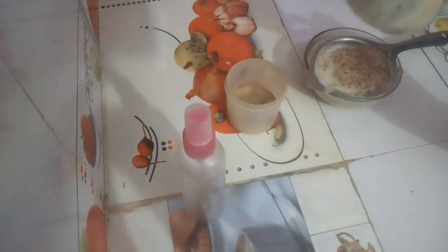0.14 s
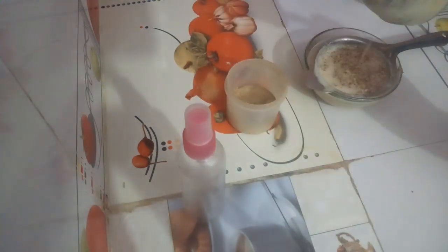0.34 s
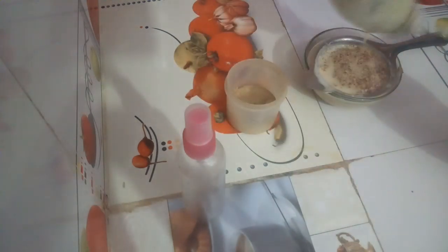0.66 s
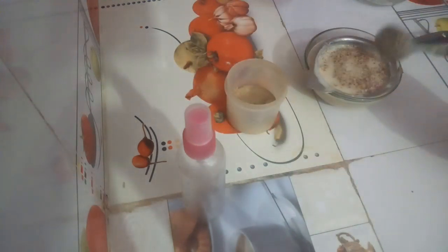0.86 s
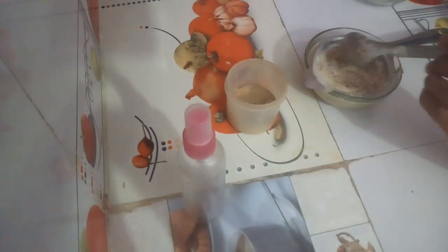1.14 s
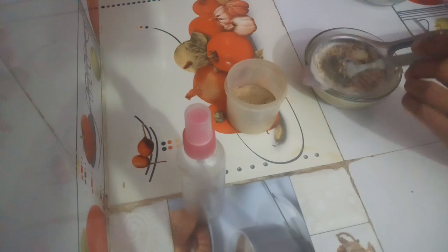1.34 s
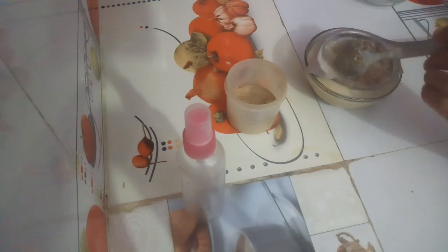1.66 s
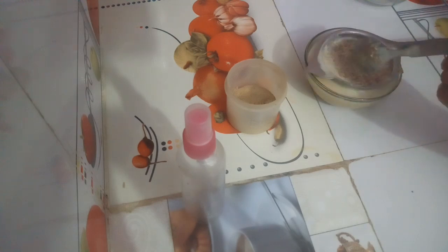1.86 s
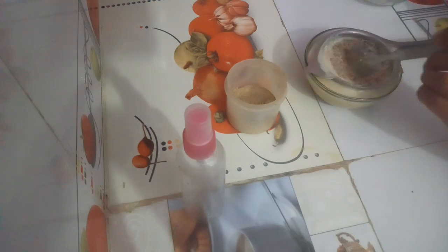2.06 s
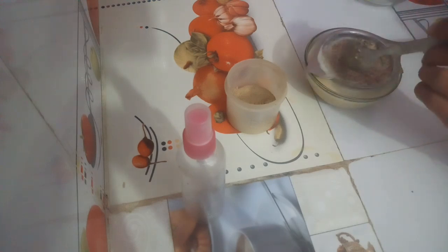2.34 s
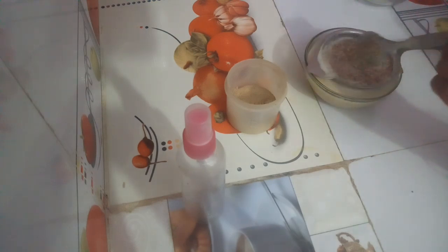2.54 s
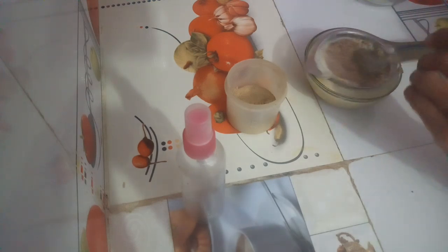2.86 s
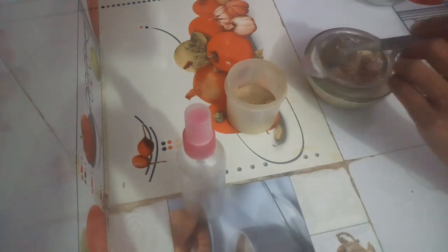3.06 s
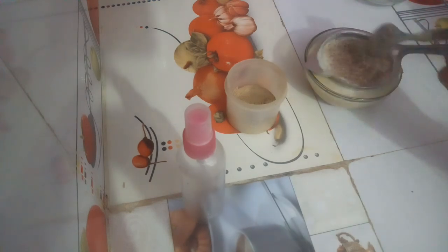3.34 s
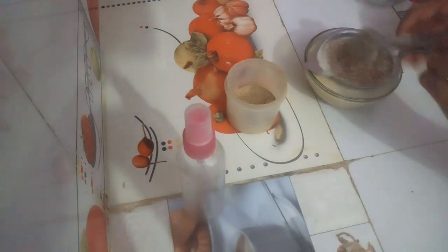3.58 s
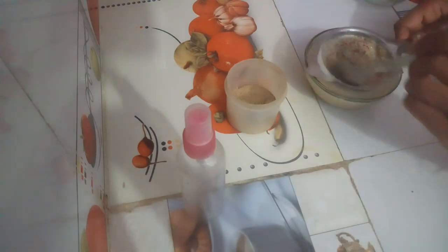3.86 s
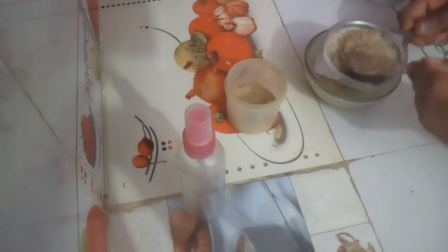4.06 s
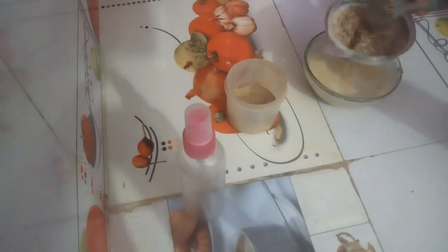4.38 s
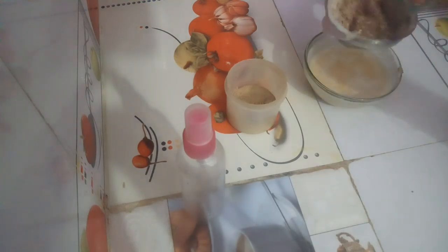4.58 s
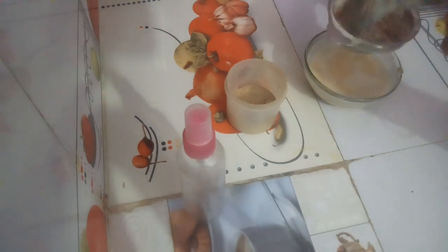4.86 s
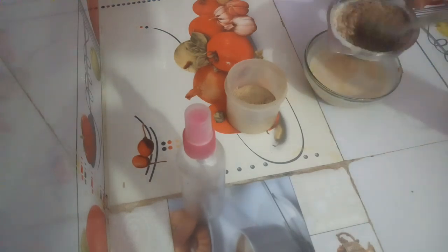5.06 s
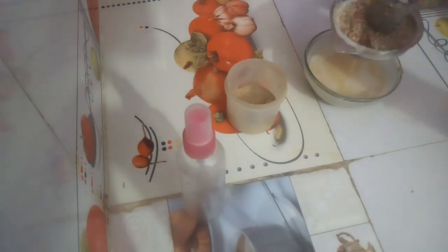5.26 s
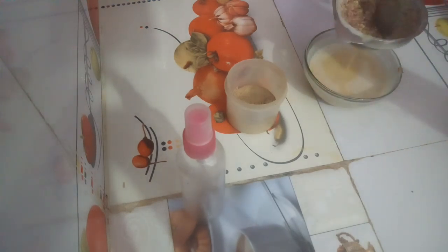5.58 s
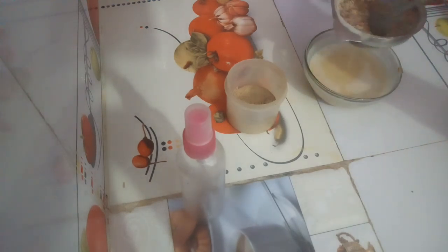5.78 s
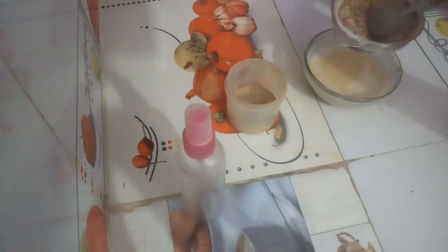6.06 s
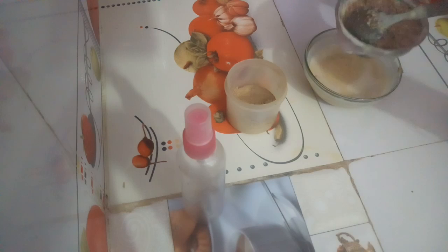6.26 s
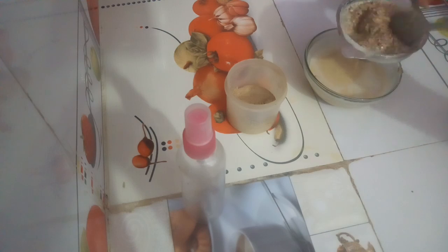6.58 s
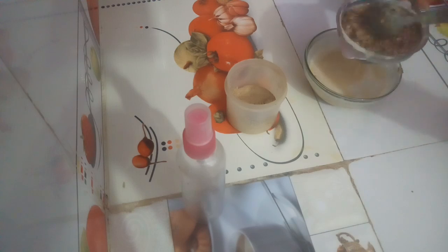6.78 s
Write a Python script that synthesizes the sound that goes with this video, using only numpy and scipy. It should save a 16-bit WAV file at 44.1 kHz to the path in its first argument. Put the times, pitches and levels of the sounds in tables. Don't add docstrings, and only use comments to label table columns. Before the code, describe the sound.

A metal spoon knocks, scrapes and taps a wire strainer over a ringing glass bowl in a small tiled kitchen, with wet paste squelching faintly.

```python
import sys
import numpy as np
from scipy import signal
from scipy.io import wavfile
from scipy.ndimage import uniform_filter1d

SR = 44100
rng = np.random.default_rng(int(sys.argv[2]) if len(sys.argv) > 2 else 0)


def to_linear_factor(level_db):
    exponent = np.asarray(level_db, float) / 20
    return 10 ** exponent


def generate_wav(signal):
    frames = np.transpose(np.atleast_2d(signal))
    scaled = np.clip(frames, -1, 1) * 32767
    pcm = np.round(scaled).astype(np.int16)
    wavfile.write(sys.argv[1], SR, pcm)


N = 305613


def evened(x):
    return x / np.sqrt(np.mean(x ** 2) + 1e-20)


def read(points, hz):
    f, value = np.transpose(points)
    return np.interp(np.log(hz + 1), np.log(f + 1), value)


def add(mix, s, sound):
    part = mix[max(round(s * SR), 0):][:len(sound)]
    part += sound[:len(part)]


def colour(x, points, tilt_db=0):
    hz = abs(np.fft.fftfreq(2048, 1 / SR))
    gain_db = read(points, hz) + tilt_db * np.log2(hz / 3000 + .03)
    log_gain = np.log(to_linear_factor(np.maximum(gain_db, -100)))
    taps = np.fft.ifft(np.exp(np.conj(signal.hilbert(log_gain)))).real[:1024]
    return signal.oaconvolve(x, taps)[:len(x)]


def resonate(x, hz, width_hz):
    turn = np.exp(2j * np.pi * np.cumsum(hz * np.ones(len(x))) / SR)
    r = np.exp(-np.pi * width_hz / SR)
    return 2 * (turn * signal.lfilter([1 - r], [1, -r], x / turn)).real


def knocks(events, body, ring_db, damping, rise_s, blur_hz, ping_db):
    out, t = np.zeros(N), np.arange(SR // 4) / SR
    rattle_colour, modes = body
    hz, db, t60 = np.transpose(modes)[:, :, None]
    for s, peak_db, tilt_db, rattle_t60, contact_hz in events:
        noise, place = rng.standard_normal(len(t)), rng.standard_normal(hz.shape)
        chatter = noise * to_linear_factor(-60 * t / np.clip(rattle_t60, .005, .3))
        rattle = colour(chatter, rattle_colour, tilt_db)
        ping = resonate(resonate(chatter * to_linear_factor(-60 * t / .06), contact_hz, 310), contact_hz, 310)

        strength_db = db + 0.62 * place + tilt_db * np.log2(hz / 3000)
        slip = np.cumsum(rng.standard_normal((len(hz), len(t))), 1) * np.sqrt(2 * np.pi * blur_hz / SR)
        decay = to_linear_factor(strength_db - 60 * t / (damping * np.minimum(t60, .45)))
        swings = decay * np.sin(2 * np.pi * hz * t + slip)
        blow = (t == 0) + 0.024 * chatter * to_linear_factor(-60 * t / .04)
        ring = signal.fftconvolve(blow, swings.sum(0))[:len(t)]

        parts = zip((rattle, ping, ring), (0, ping_db, ring_db))
        sound = sum(to_linear_factor(part_db) * part / part[:500].std() for part, part_db in parts)
        onset = np.sin(np.minimum(t / rise_s, np.pi / 2)) ** 2
        add(out, s - .0004, to_linear_factor(peak_db - 12.0) * sound * onset / sound[:500].std())
    return out


def pushes(rows):
    t = np.arange(0, N + 50, 50) / SR
    s, db, build_s, release_s = np.transpose(rows)[:, :, None]
    away = np.maximum((s - t) / np.maximum(build_s, .002), (t - s) / np.maximum(release_s, .002))
    gain = np.sqrt((to_linear_factor(db - 20 * away) ** 2).sum(0))
    return uniform_filter1d(np.interp(np.arange(N) / SR, t, gain), size=300)


def drag(rows, spectrum, uneven_db):
    unevenness = evened(uniform_filter1d(rng.standard_normal(N), 200))
    slips = rng.standard_normal(N) * to_linear_factor(uneven_db * unevenness)
    return pushes(rows) * evened(colour(slips, spectrum))


def ringing(modes, width_hz, valley_db):
    f = np.arange(300, 16000, 20.)
    hz, db, _ = np.transpose(modes)[:, :, None]
    peaks = (to_linear_factor(db) / (1 + (2 * (f - hz) / width_hz) ** 2)) ** 2
    return np.transpose([f, 10 * np.log10(peaks.sum(0) + to_linear_factor(valley_db) ** 2)])


def rub(strokes, width_hz, edge_s):
    t, gain, hz = np.arange(N) / SR, np.zeros(N), np.zeros(N)
    for s, length, db, stroke_hz in strokes:
        gain += to_linear_factor(db) * np.clip(np.minimum(t - s, s + length - t) / edge_s + .5, 0, 1)
        hz[t >= s - edge_s / 2] = stroke_hz
    skips = uniform_filter1d(uniform_filter1d(rng.standard_normal(N), size=900), size=900)
    gain *= to_linear_factor(1.8 * evened(skips))
    return gain * evened(resonate(resonate(rng.standard_normal(N), hz, width_hz), hz, width_hz))


# frequency_hz, density_db_per_hz
WASH = [(25, -17.5), (70, -12.5), (102, -2), (150, -12.5), (310, -22.5), (480, -17), (610, -9.5),
        (1100, -13.5), (2100, -26.5), (5200, -28.5), (7000, -38.5), (10000, -44), (15400, -37),
        (15900, -73.5)]
# time_s, level_db
WASH_DB = [(0, -58), (1.2, -60), (2.0, -63), (2.6, -58), (3.498, -57.5), (4.4, -58.5), (6.0, -57.5),
           (6.93, -59.5)]
# frequency_hz, width_hz, level_db
HUM = [(98.1, 7.2, -64.5), (206.3, 5.4, -70), (628.2, 42, -65.5)]


def background():
    frames, hz = N // 512 + 5, np.fft.rfftfreq(2048, 1 / SR)
    a, b, patches = rng.standard_normal((frames, len(hz), 3)).T
    patches = evened(uniform_filter1d(uniform_filter1d(patches, 20, 0), 8, 1))
    spectra = (a + 1j * b) * to_linear_factor(read(WASH, hz)[:, None] + 1.5 * patches)
    wash = evened(signal.istft(spectra, nperseg=2048, noverlap=1536)[1][:N])
    hum = sum(to_linear_factor(db) * evened(resonate(rng.standard_normal(N), f, width)) for f, width, db in HUM)
    s, level_db = np.transpose(WASH_DB)
    return to_linear_factor(0.5 + np.interp(np.arange(N) / SR, s, level_db)) * wash + hum


# rattle (frequency_hz, density_db_per_hz), then modes (frequency_hz, level_db, t60_s).
JAR = ([(290, -34), (500, -20), (1000, -11), (1450, 1), (2040, -5.5), (4090, -5.5), (5970, -6),
        (10200, -6.5), (10800, -29), (13400, 2), (16000, -32)], [(1200, -12, 0.028), (4640, 6, 0.086),
        (6800, 1, 0.055), (7330, 6, 0.09), (8590, 3, 0.14), (10320, 1, 0.27), (11700, -1.5, 0.24),
        (12200, -5, 0.14), (13600, 1, 0.22)])
# start_s, peak_db, tilt_db_per_octave, rattle_t60_s, contact_hz
JAR_KNOCKS = [
    (0.001, -33, 1, .05, 1510),
    (0.358, -10, -0.5, 0.016, 1350),
    (0.364, -27, -4, .03, 4400),
    (0.372, -19.5, 1.5, 0.025, 5000),
]
JAR_SETTLES = [
    (0.396, -19, -1.1, 0.042, 3050),
    (0.41, -27.5, 0, 0.098, 3980),
    (0.425, -40, -1, 0.046, 1200),
]


def jar_knocks():
    struck = knocks(JAR_KNOCKS, JAR, ring_db=-3.0, damping=0.5, rise_s=0.0012, blur_hz=38, ping_db=-5.5)
    settling = knocks(JAR_SETTLES, JAR, ring_db=-7.0, damping=0.51, rise_s=0.0026, blur_hz=40, ping_db=1.8)
    return struck + settling


# peak_s, level_db, build_20db_s, release_20db_s
SQUELCH = [(0.001, -45.5, -1.5, 0.2), (.122, -55, -3, 0.2), (.5, -55.5, -0.05, 0.5), (1.33, -62, 1, -3),
           (1.464, -52.5, 0.1, 0.44), (1.618, -51.5, -0.14, 0.1), (2.036, -67, -1, 1.2),
           (3.22, -59.5, -1, -2.8), (3.42, -55, -1, 0.4), (3.5, -65.5, 4, 1), (3.87, -55, -0.35, 0.1),
           (3.95, -52, 0.17, 0.27), (4.12, -58, 0.06, 0.2), (5.14, -59.5, 0.18, -0.25),
           (5.63, -66, 0.1, 0.5), (5.96, -54, 0.11, 0.04), (6.22, -66, 1, 1), (6.698, -71.5, 0.5, 1.2),
           (6.88, -61.5, 0.2, -0.5)]
# frequency_hz, density_db_per_hz
PASTE = [(470, -30.5), (800, -13.5), (1050, -12.5), (1850, -3.5), (2070, -10.5), (8340, -11), (9690, -25.5),
         (12300, -18.5), (16000, -26)]


def squelch():
    size = to_linear_factor(0.8 * np.minimum(rng.exponential(1, N), 5))
    happens = rng.random(N) < 5000 / SR
    pops = size * happens * rng.standard_normal(N)
    return to_linear_factor(-5.5) * pushes(SQUELCH) * evened(colour(pops, PASTE))


# start_s, length_s, level_db, resonance_hz
SINGING = [(0.05, 0.038, -59, 1490), (0.125, 0.012, -41.5, 1530), (0.2, 0.027, -67, 3270),
           (0.285, 0.069, -59, 1343), (0.652, 0.019, -56.5, 4120), (2.885, 0.034, -57, 2970),
           (2.93, 0.078, -48, 2930), (3.352, 0.08, -58.5, 3540)]


def edge_singing():
    return rub(SINGING, width_hz=130, edge_s=.02)


# peak_s, level_db, build_20db_s, release_20db_s
DRAG = [(.112, -44, -0.43, -0.02), (.134, -46, -0.88, 0.05), (.44, -58.5, 0, 0.5),
        (.565, -52.5, -0.02, 0.48), (2.84, -48, 0.21, -0.04), (2.976, -42.5, 0.19, 0.29),
        (3.12, -49.5, 0, 0.32), (3.185, -61.5, 0.3, -0.3), (3.212, -48, 0.23, 0.03),
        (5.988, -53, 0.18, -0.56), (6.89, -57, 0.1, 0)]
# frequency_hz, density_db_per_hz
DRAG_COLOUR = [(300, -25.5), (700, 3.5), (1100, 1), (1600, -2.5), (2200, -9.5), (2900, -1.5), (4000, -12),
               (6000, -12.5), (8000, -32.5), (16000, -46)]


def counter_drag():
    return drag(DRAG, DRAG_COLOUR, uneven_db=1.8)


MESH = ([(290, -51), (500, 5.5), (1840, 2), (2360, -2), (4340, -1), (8330, -11.5), (9630, -26),
         (12300, -17.5), (16000, -27)], [(5000, -9, 0.05), (5100, -10, 0.078), (6930, -4, 0.11)])
# start_s, peak_db, tilt_db_per_octave, rattle_t60_s, contact_hz
TICKS = [(0.125, -38, -2, 0.023, 1570), (0.213, -49, 5, 0.067, 3120), (1.327, -42.5, 5.5, 0.11, 796),
         (1.458, -38, 2.8, 0.038, 695), (1.595, -42, 7, 0.082, 813), (3.353, -41, 1.5, 0.92, 3260),
         (3.403, -27, 0.7, 0.068, 716), (3.864, -29.5, 0, 0.15, 1730), (3.95, -29.5, 3.5, 0.16, 4350),
         (4.046, -42.5, 1.5, 0.2, 694), (4.123, -41.5, 7, 0.068, 4500), (5.149, -41.5, 9, 0.07, 1400),
         (5.622, -45, 2, 0.26, 1145), (5.958, -33, 4, 0.033, 900), (5.965, -35.5, 9, 0.028, 4960),
         (5.987, -36, 7, 0.043, 1830), (6.015, -38.5, 0.3, 0.033, 2980), (6.017, -39.5, 0, .03, 1700),
         (6.056, -48, 3, .03, 7000), (6.081, -41, 2.5, 0.2, 1610), (6.21, -43, 4, 0.067, 1030),
         (6.434, -42.5, -3.2, 0.052, 4050), (6.7, -50, 4, 0.036, 6340)]


def mesh_ticks():
    return knocks(TICKS, MESH, ring_db=-19.0, damping=0.51, rise_s=0.00147, blur_hz=80, ping_db=-3.0)


SPOON = ([(290, -63), (500, -28.5), (1980, -11.5), (2430, -16.5), (3490, -10.5), (3980, -6), (5470, -20),
          (7100, -14.5), (9630, -34), (10700, -28), (15100, -41), (16000, -89)], [(2050, -6, 0.03),
          (3990, 0, 0.091), (4160, -4.5, 0.055), (6020, -11.5, 0.046), (6950, -14, 0.14), (7200, -10, 0.14),
          (10500, -22.5, .08), (12000, -23, 0.055)])
# start_s, peak_db, tilt_db_per_octave, rattle_t60_s, contact_hz
SPOON_TOUCH = [
    (0.7139, -23.5, -1.5, 0.035, 1964),
    (0.717, -25.5, 0, .03, 4120),
]
SPOON_SLIPS = [(0.729, -29.5, -1, .03, 4156), (0.743, -31, -1.5, 0.05, 2050),
               (0.749, -24.5, -.5, .03, 4200), (0.7555, -19.5, -1.3, 0.03, 4106),
               (0.7665, -13, -0.4, 0.02, 3990), (0.772, -15, -0.6, 0.025, 3905),
               (0.779, -20, -.5, 0.025, 4000), (0.787, -26.5, 0.91, .025, 7110),
               (0.797, -30.5, -1, .025, 4100), (0.809, -31.5, -1, .03, 3988), (0.833, -34.5, 0, .03, 3958),
               (0.88, -47, 0, .03, 3992)]
# peak_s, level_db, build_20db_s, release_20db_s
SPOON_SLIDE = [
    (.746, -40.5, .01, .03),
    (.758, -31.5, .03, .015),
    (.768, -28.5, .015, .015),
    (.778, -31.5, .02, .04),
]


def spoon_slips():
    touch = knocks(SPOON_TOUCH, SPOON, ring_db=-1.5, damping=0.55, rise_s=0.0008, blur_hz=60, ping_db=-1.5)
    slips = knocks(SPOON_SLIPS, SPOON, ring_db=3.1, damping=0.24, rise_s=0.0025, blur_hz=70, ping_db=1.7)
    slide = drag(SPOON_SLIDE, ringing(SPOON[1], width_hz=280, valley_db=-45), uneven_db=2.5)
    return touch + slips + slide


RIM = ([(200, -31), (380, -12), (550, -21), (1000, -14), (1570, -9), (2200, -17), (3200, -11), (4600, -5.5),
        (5600, -5), (8300, -6.5), (9500, -13.5), (13000, -15), (15000, -17), (16000, -37)],
        [ (4150, -6, 0.11), (4630, -6, 0.22), (5600, -3.5, .3), (6800, -7.5, 0.13), (7400, -8, .12),
        (8400, -6, .06), (8800, -6.5, .12), (10260, -13, .15), (12500, -7, 0.14)])
# start_s, peak_db, tilt_db_per_octave, rattle_t60_s, contact_hz
RIM_KNOCKS = [
    (1.018, 0, 0.7, 0.054, 8055),
    (1.029, -11, .7, .05, 5494),
]


def rim_knocks():
    return knocks(RIM_KNOCKS, RIM, ring_db=-9.5, damping=0.53, rise_s=0.00036, blur_hz=110, ping_db=-3.7)


# start_s, level_db, pitch_hz, t60_s
FOOT_KNOCKS = [(1.018, -29, 371, 0.096), (1.452, -38, 281, 0.18), (1.597, -45.5, 281.3, 0.18),
               (2.667, -37.5, 199, 0.17), (2.722, -40.5, 203.5, 0.19), (2.765, -41.5, 204, 0.16),
               (3.405, -37, 765, .1), (3.866, -41.5, 165, 0.09), (3.868, -39, 422, .08),
               (3.939, -33, 335, 0.11)]


def foot():
    out, t = np.zeros(N), np.arange(SR // 4) / SR
    for s, db, hz, t60 in FOOT_KNOCKS:
        decay = to_linear_factor(db - 60 * t / t60) * np.minimum(t / .006, 1)
        add(out, s, decay * np.sin(2 * np.pi * hz * t))
    return out


# peak_s, level_db, build_20db_s, release_20db_s
ROCKING = [(1.02, -21, -0.33, 0.0435), (1.075, -17, -0.05, -0.07), (1.17, -50, 0.36, 0.23),
           (1.465, -45, -0.02, 0.06), (1.605, -43, 0.03, 0.03), (1.66, -44, 0.22, 0.06),
           (2.67, -42, -0.2, 0.25), (2.85, -48, 0.18, -1), (3.004, -38, 0.06, 0.18),
           (3.36, -43.5, -0.42, 0.3), (3.41, -36, -0.06, -0.05), (3.87, -42.5, -0.13, 0.18),
           (3.956, -53, -0.12, 0.19), (6.48, -58.5, 0.35, 0.24)]
# frequency_hz, width_hz, level_db
BELLY = [(165, 60.2, -10), (232, 73, -5), (265.4, 50.6, -4.5), (320, 70, -1), (341.5, 50, 0.5),
         (422, 59, -17.5), (626, 77, -4), (772, 86, -9)]


def rocking():
    slips = rng.standard_normal(N)
    belly = sum(to_linear_factor(db) * evened(resonate(resonate(slips, hz, width), hz, width)) for hz, width, db in BELLY)
    pressed = belly / np.sqrt(uniform_filter1d(belly ** 2, 1200))
    return pushes(ROCKING) * pressed


# start_s, length_s, level_db, resonance_hz
UPPER_RUB = [(1.72, 0.12, -62, 5160), (1.82, 0.23, -63.5, 5380), (2.93, 0.13, -54, 5840),
             (4.86, 0.34, -63.5, 5100), (5.85, 0.3, -69.5, 5030), (6.08, 0.23, -63, 5100)]
LOWER_RUB = [
    (2.945, 0.057, -53.5, 3620),
    (4.62, 0.85, -72.5, 3900),
]


def wire_rubs():
    return rub(UPPER_RUB, width_hz=570, edge_s=0.037) + rub(LOWER_RUB, width_hz=350, edge_s=0.02)


BOWL = ([(120, -44), (190, -18), (800, -8), (1400, -5.5), (2420, -5.5), (2860, 1.5), (3620, -7),
         (4270, -7.5), (4950, -19), (5630, -4.5), (6880, -25.5), (8000, -17.5), (9600, -37), (14100, -39),
         (16000, -64)], [ (1020, -8, .12), (1335, -15, 0.16), (1674, 0, 0.15), (2120, -14.5, 0.16),
         (2592, -5, 0.18), (2880, 5, 0.49), (2980, -12, 0.28), (3120, -2, 0.27), (3385, 1, 0.22),
         (3690, -2, 0.2), (4060, -10.5, 0.16), (4350, 5.5, 0.43), (5620, -3, 0.16), (5900, -16, .2)])
REBOUND = ([(120, -45), (190, -16), (450, -10), (1250, -4.5), (2200, -12.5), (2800, 2), (3500, -13),
            (4300, -17), (4950, -28.5), (5700, -16), (6900, -43.5), (9000, -48), (16000, -70)],
            [ (1178, -5.5, 0.18), (1310, -10, 0.254), (1540, -14, 0.11), (2020, -11, 0.155),
            (2606, 3.5, 0.21), (2750, -1, 0.5), (2690, -4, 0.2), (2730, -7, 0.25), (2940, -7, .35),
            (3120, 0, 0.23), (3130, -6.5, 0.16), (3250, -3.5, 0.25), (4500, -15.5, 0.16), (5480, -16, 0.14)])
# start_s, peak_db, tilt_db_per_octave, rattle_t60_s, contact_hz
BOWL_KNOCKS = [
    (2.6655, -6, -0.78, 0.082, 1250),
    (2.673, -10.5, 0.24, 0.069, 4250),
    (2.68, -15.5, 0.38, 0.12, 2900),
    (2.688, -14, -0.14, 0.065, 4150),
    (2.702, -16.5, -1.4, 0.067, 1630),
]
BOWL_REBOUNDS = [(2.72, -5, 0, 0.066, 2970), (2.73, -16, 0.38, 0.087, 3120),
                 (2.743, -10.5, 0.29, 0.025, 2730), (2.751, -9.5, 0.27, 0.084, 2870),
                 (2.763, -21, -0.34, 0.047, 2698), (2.777, -17.5, 1, 0.039, 4350),
                 (2.785, -16.5, -1, 0.054, 2750), (2.8, -24, -1, 0.043, 2710),
                 (2.826, -45, -1, 0.034, 2820), (2.852, -37, -1.1, .03, 2750)]
# peak_s, level_db, build_20db_s, release_20db_s
BOWL_SLIDE = [
    (2.728, -27, 0.0046, 0.024),
    (2.757, -26, .03, 0.02),
    (2.785, -32, .03, 0.051),
    (2.835, -39.5, 0.046, 0.042),
]
BOWL_NUDGE = [
    (3.8655, -24.5, -8.5, 0.03, 1070),
]


def bowl_knocks():
    struck = knocks(BOWL_KNOCKS, BOWL, ring_db=-5.5, damping=0.83, rise_s=0.00071, blur_hz=45, ping_db=-7.0)
    rebounds = knocks(BOWL_REBOUNDS, REBOUND, ring_db=-1.14, damping=0.54, rise_s=0.0031, blur_hz=43.7,
                      ping_db=-15.0)
    slide = drag(BOWL_SLIDE, ringing(REBOUND[1], width_hz=90, valley_db=-21), uneven_db=2.7)
    nudge = knocks(BOWL_NUDGE, BOWL, ring_db=-13.0, damping=1.0, rise_s=0.0011, blur_hz=46, ping_db=-10.5)
    return struck + rebounds + slide + nudge


STEEL = ([(3000, -38), (8000, -14), (13000, -17), (16000, -43)], [(7950, 3, .1), (8880, -1, 0.254),
          (10250, 1.5, 0.33), (11200, -15, 0.24), (13800, 2.5, .32)])
# start_s, peak_db, tilt_db_per_octave, rattle_t60_s, contact_hz
STEEL_PINGS = [
    (2.666, -29.5, 0, 0.018, 7950),
    (2.721, -54.5, 0.0031, 0.018, 8800),
]


def steel_pings():
    return knocks(STEEL_PINGS, STEEL, ring_db=8.9, damping=0.98, rise_s=.001, blur_hz=18.5, ping_db=-3.0)


HANDLE = ([(120, -80), (200, -18), (340, -7.5), (867, -1), (2860, -5.5), (3690, -11), (7410, -20.5),
           (9600, -25.5), (12000, -16), (16000, -28)], [ (1610, -2, 0.14), (2870, -6, 0.08),
           (2586, -3, 0.1), (790, -2, .1), (2830, -5, 0.12), (3450, -35, 0.11), (4500, -13.5, 0.11),
           (6300, -15.5, 0.22), (6455, -30, 0.17), (7320, -14, 0.3), (7620, -11, 0.26), (8620, -15, 0.28),
           (10190, -13, 0.18), (11640, -10, 0.093), (12760, -24, 0.11)])
# start_s, peak_db, tilt_db_per_octave, rattle_t60_s, contact_hz
HANDLE_KNOCKS = [
    (3.018, -11, 1.5, 0.11, 6200),
    (3.029, -9, 0.8, 0.12, 2850),
    (3.043, -21, -2.5, 0.18, 1540),
    (3.057, -19.5, 1.5, 0.28, 2570),
    (3.176, -30, -1.5, 0.043, 1610),
    (3.188, -33.5, -1.5, 0.027, 1060),
]


def handle_knocks():
    return knocks(HANDLE_KNOCKS, HANDLE, ring_db=-1.7, damping=0.93, rise_s=0.0024, blur_hz=25, ping_db=-3.0)


SHANK = (HANDLE[0], [(3505, 2, 0.2), (5160, -9, 0.23), (7650, -24, 0.27)])
# start_s, peak_db, tilt_db_per_octave, rattle_t60_s, contact_hz
HANDLE_PINGS = [
    (3.036, -14, 0.00032, .05, 3500),
    (3.082, -18.5, 0, .05, 3500),
]


def shank_pings():
    return knocks(HANDLE_PINGS, SHANK, ring_db=21.0, damping=1.0, rise_s=.004, blur_hz=2.3, ping_db=-19.0)


TAPPED_RIM = ([(290, -77), (500, -46), (613, -15), (1250, -23), (1690, -9), (3290, -11.5), (4530, -5),
               (6420, -16.5), (8330, -10), (14200, -17.5), (16000, -29)], [(4710, -10, 0.094),
               (7770, -3, 0.16), (8100, -3, .1), (8400, -3, 0.13), (10030, -9.5, 0.079)])
# start_s, peak_db, tilt_db_per_octave, rattle_t60_s, contact_hz
RIM_TAPS = [
    (6.3575, -7.5, 0.78, 0.0489, 1660),
    (6.374, -40, 0.89, 0.025, 1670),
]
# peak_s, level_db, build_20db_s, release_20db_s
RIM_SLIDE = [
    (6.385, -40, -0.0153, 0.1145),
    (6.44, -50, 0, 0.15),
    (6.484, -45, 0.15, 0.02),
]
# frequency_hz, density_db_per_hz
RIM_SLIDE_COLOUR = [(500, -31), (1100, -3.5), (2500, -7.5), (4200, -5.5), (6800, -5), (9500, -10),
                    (14500, -12.5), (15600, -39)]


def rim_taps():
    taps = knocks(RIM_TAPS, TAPPED_RIM, ring_db=-2.5, damping=0.72, rise_s=0.0026, blur_hz=110, ping_db=-6.5)
    return taps + drag(RIM_SLIDE, RIM_SLIDE_COLOUR, uneven_db=0.5)


# frequency_hz, t60_s
KITCHEN = [(200, .25), (600, 0.22), (1500, 0.29), (4000, 0.28), (10000, .22)]


def kitchen(x):
    taps = np.zeros(SR // 2)
    at = np.arange(150, len(taps) - 20, 15)
    taps[at + rng.integers(0, 15, len(at))] = rng.choice([-1., 1.], len(at))
    hz, t, z = signal.stft(taps, SR, nperseg=256)
    tail = signal.istft(z * to_linear_factor(-60 * t / read(KITCHEN, hz)[:, None]), SR, nperseg=256)[1]
    return signal.fftconvolve(x, tail / np.linalg.norm(tail))[:N]


def scene():
    small = squelch() + edge_singing() + counter_drag() + mesh_ticks() + wire_rubs()
    sources = [(jar_knocks() + rim_taps(), -6.5),
               (small, -5.0),
               (spoon_slips(), -12.0),
               (rim_knocks(), -3.0),
               (bowl_knocks(), -7.0),
               (steel_pings() + shank_pings(), -10.0),
               (handle_knocks(), -5.5)]
    sounds, room_db = zip(*sources)
    parts = signal.lfilter(*signal.butter(2, 130, "high", fs=SR), np.array(sounds))
    thuds = foot() + rocking()
    room = kitchen(to_linear_factor(room_db) @ parts + to_linear_factor(-23.5) * thuds)
    return (parts.sum(0) + thuds + room + background())[None]


# frequency_hz, depth_under_loudest_band_db
MASKING = [(190, 74), (270, 27), (420, 37), (560, 70.5), (5000, 70), (7500, 52), (9200, 38.5),
           (11500, 36.5), (13000, 44), (15200, 41.5), (15700, 30), (16500, 26)]


def band_limit(x):
    return signal.sosfilt(signal.butter(12, 16480, fs=SR, output="sos"), x)


def record(dry):
    hz, t, z = signal.stft(dry[0], SR, nperseg=1024, noverlap=768)
    power = uniform_filter1d(uniform_filter1d(abs(z) ** 2, size=5, axis=0), size=3, axis=1)
    level_db = 10 * np.log10(power + 1e-20)
    over_db = level_db - level_db[hz > 300].max(0) + read(MASKING, hz)[:, None]
    kept = signal.istft(z * np.clip(over_db / 5.9, 0, 1), SR, nperseg=1024, noverlap=768)[1][:N]

    power_db = 10 * np.log10(abs(uniform_filter1d(kept ** 2, size=100)) + 1e-12)
    blocks = np.pad(power_db, (759, -(N + 759) % 1024), "edge").reshape(-1, 1024)[:, ::-1]
    coming_db = np.maximum.accumulate(blocks, 1)[:, ::-1].ravel()[759:N + 759]
    bass = signal.sosfiltfilt(signal.butter(4, 1100, fs=SR, output="sos"), kept)
    loss_db = np.clip(3.0 * (coming_db - power_db - 24), 0, 40)
    kept = bass + (kept - bass) * to_linear_factor(-loss_db)

    capped = signal.oaconvolve(np.clip(kept, -.86, .86), signal.firwin(255, 16450, fs=SR), "same")
    return band_limit(capped[None])


dry = scene()
out = record(dry)
generate_wav(out)
```